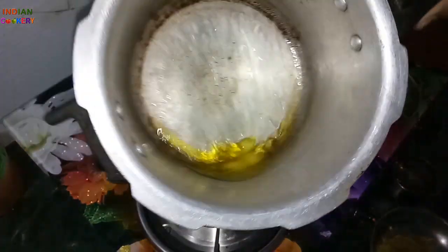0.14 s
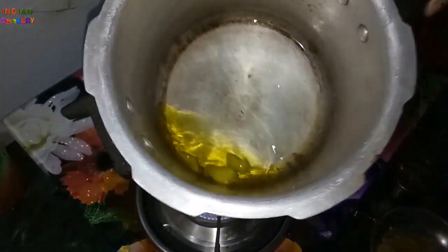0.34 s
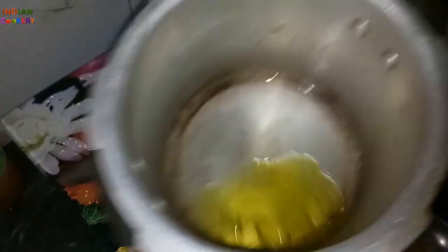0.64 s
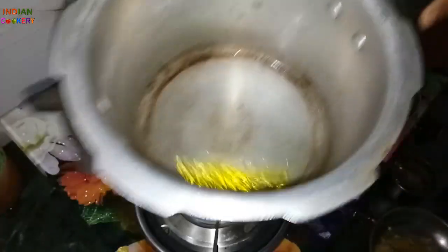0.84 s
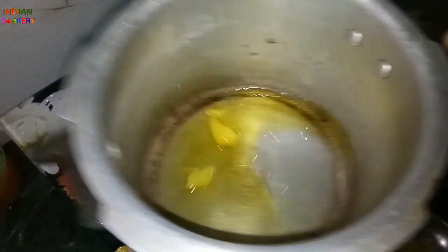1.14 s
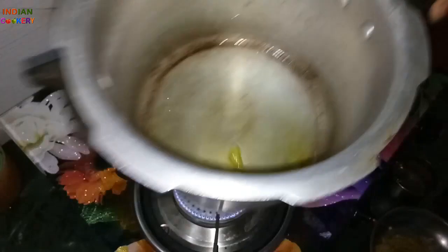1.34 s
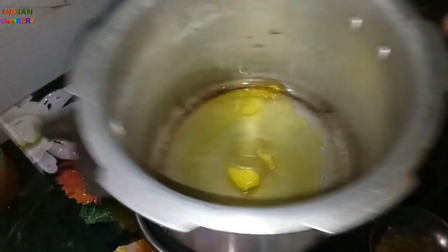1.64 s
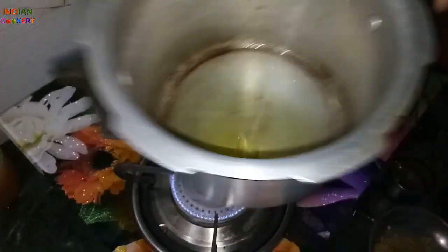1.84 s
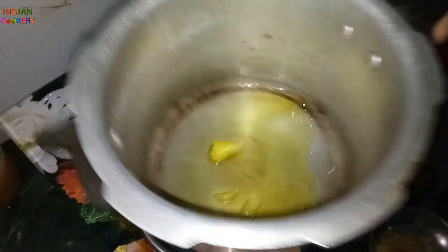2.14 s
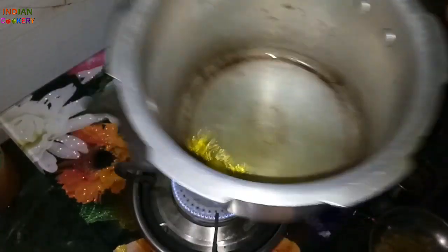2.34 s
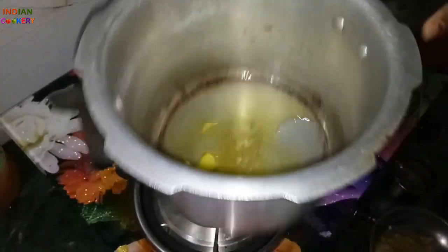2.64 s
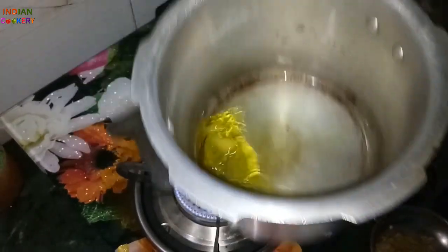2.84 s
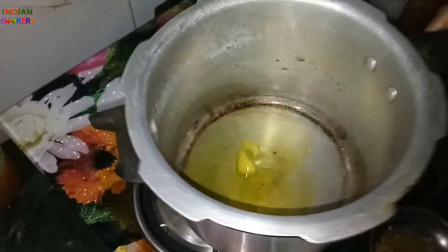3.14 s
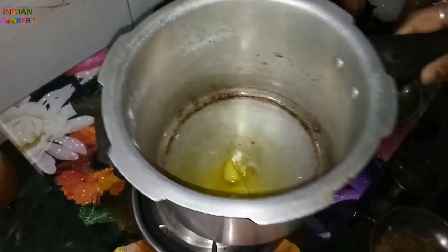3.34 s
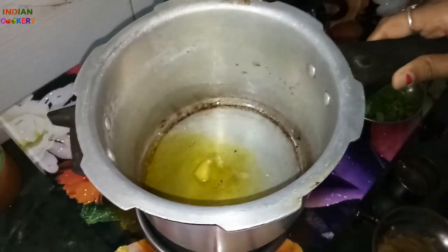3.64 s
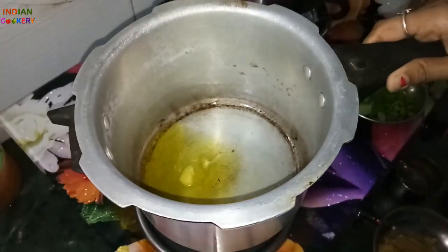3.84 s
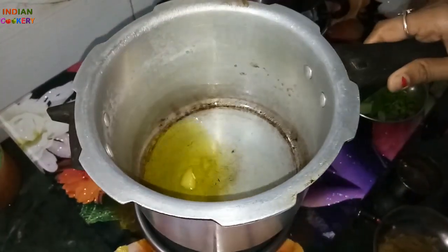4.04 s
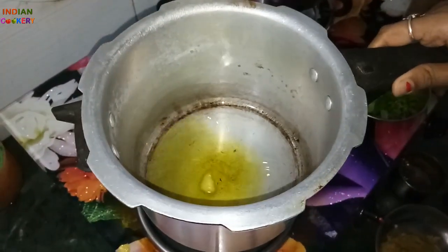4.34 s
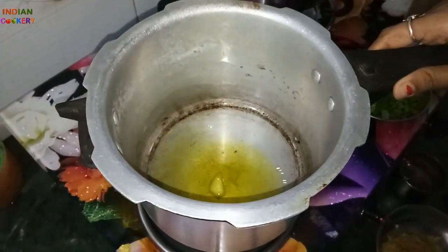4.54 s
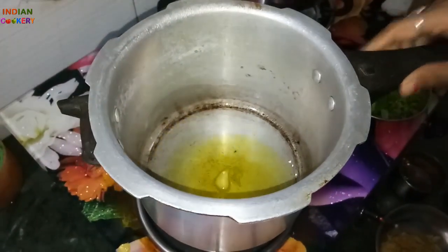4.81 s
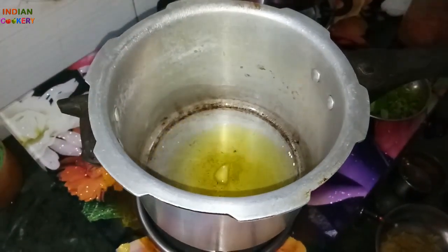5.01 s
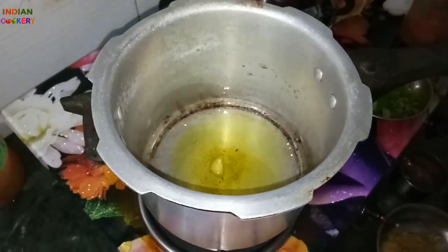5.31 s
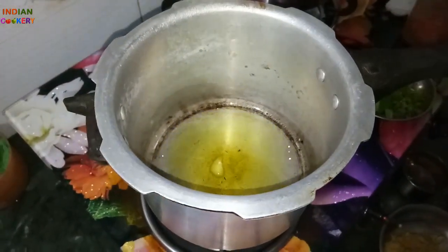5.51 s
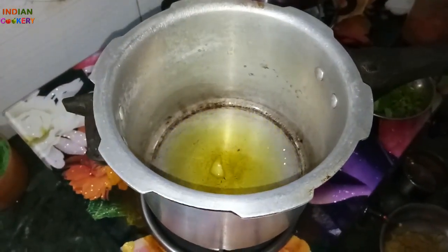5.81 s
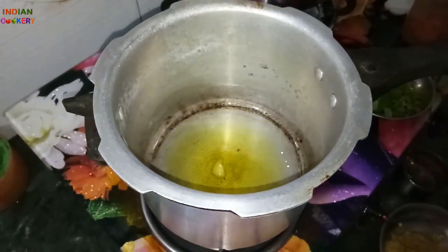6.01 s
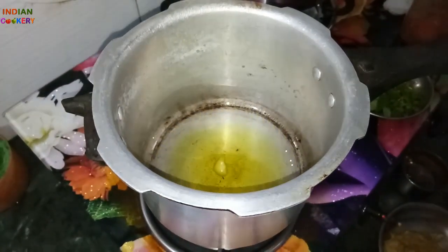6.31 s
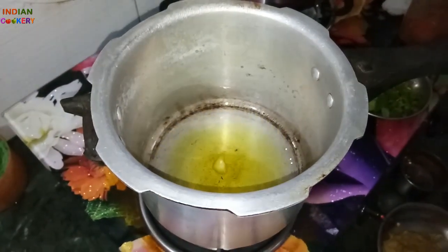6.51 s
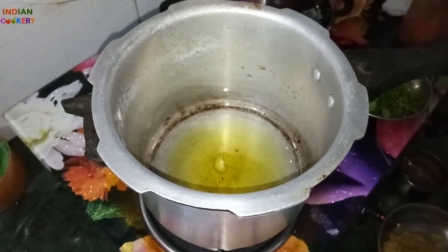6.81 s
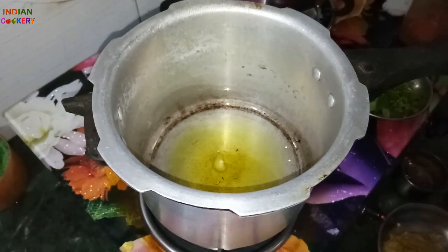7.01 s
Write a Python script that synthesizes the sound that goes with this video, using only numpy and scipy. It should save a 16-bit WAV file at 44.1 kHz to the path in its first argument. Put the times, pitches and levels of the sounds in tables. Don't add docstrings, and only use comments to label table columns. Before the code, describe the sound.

Hot fat spits and crackles sharply in a metal pot, bubbles ringing its thin base, with a few dull knocks on the counter.

```python
import sys
import numpy as np
from scipy import signal
from scipy.fft import rfft, irfft
from scipy.io import wavfile
from scipy.ndimage import uniform_filter1d

SR = 44100
rng = np.random.default_rng(int(sys.argv[2]) if len(sys.argv) > 2 else 0)


def natural_amplitude(level_db):
    exponent = np.asarray(level_db, float) / 20
    return 10 ** exponent


def store_wav(level_fs):
    pcm = np.round(np.clip(np.atleast_2d(level_fs), -1, 1) * 32767)
    wavfile.write(sys.argv[1], SR, pcm.T.astype(np.int16))


N = 315756
LENGTH = 16384
TIME, HZ = np.arange(LENGTH) / SR, np.fft.rfftfreq(LENGTH, 1 / SR)


def evened(x):
    return x / np.sqrt(np.mean(x ** 2) + 1e-20)


def read(points, hz):
    f, value = np.transpose(points)
    return np.interp(np.log(hz + 1), np.log(f + 1), value)


def over_time(points):
    return np.interp(np.arange(N) / SR, *np.transpose(points))


def add(mix, s, sound):
    part = mix[max(round(s * SR), 0):][:len(sound)]
    part += sound[:len(part)]


def coloured(x, gain):
    return irfft(rfft(x) * gain, len(x))


def peak(hz, sharp):
    return 1 / (1 + (sharp * (HZ / hz - hz / (HZ + 1))) ** 2)


def tilt(db):
    return natural_amplitude(db * np.log2((HZ + 1) / 2900))


def swell(rise):
    return 1 - np.exp(-TIME / rise)


def pops(table, source):
    out = np.zeros(N)
    for row, noise in zip(table, rng.standard_normal((len(table), LENGTH))):
        add(out, row[0], source(*row, noise))
    return out


# (frequency [Hz], level [dB])
MIC = [(500, -25), (2700, -12.5), (4100, 0), (7800, -1), (9000, 7), (10200, 7.5), (11500, 0), (13300, -7),
       (14100, -1), (14900, 6.5)]


def microphone(share=1):
    return natural_amplitude(share * read(MIC, HZ))


# (frequency [Hz], t60 [s])
CAVITY = [(1500, 0.046), (4000, 0.097), (8000, 0.062), (16000, 0.053)]


def echo(noise, gain, rise=0.00004):
    unevenness = evened(uniform_filter1d(noise[::-1], 70))
    ragged = natural_amplitude(4 * unevenness * swell(.006))
    hz, t, z = signal.stft(evened(coloured(noise, gain) * ragged), SR, nperseg=128)
    pot_fall = natural_amplitude(-60 * t / read(CAVITY, hz)[:, None])
    kitchen_fall = natural_amplitude(-21.0 - 60 * t / 0.46)
    return signal.istft(z * (pot_fall + kitchen_fall), SR, nperseg=128)[1][:LENGTH] * swell(rise)


# (frequency [Hz], level [dB], t60 [s], pull of the fat's load [exponent])
BASE = [(1584, -5, 0.18, 2), (2070, -7, 0.034, 2), (2385, 3.5, 0.14, 0.83), (2415, -7, 0.35, 0.8),
        (7290, -8, 0.088, -7.5), (3420, -7.5, 0.29, 0.43), (4035, -4, 0.092, 1.5), (5010, -3, 0.15, 1.1),
        (5514, -0.5, 0.062, 7), (6620, -1.5, 0.17, 0.3), (6900, 1, 0.036, 1), (8980, 4, 0.035, 1)]
LOAD_HZ = 2400
# (time [s], frequency [Hz])
LOAD = [
    (0, 2535),
    (.5, 2569),
    (1.25, 2545),
    (1.8, 2401),
    (2.55, 2518),
    (3.2, 2478),
    (4.3, 2485),
    (4.6, 2385),
    (5.2, 2424),
    (7.16, 2401),
]


def ring(s, gain, chance):
    hz, db, t60, give = np.transpose(BASE)[:, :, None]
    phase, uneven, detune, beat = chance[:4 * len(BASE)].reshape(4, -1, 1)
    load = np.interp(s, *np.transpose(LOAD)) / LOAD_HZ
    hz = hz * load ** give * (1 + 0.00603 * detune)
    wobble = 1 + .45 * np.sin(2 * np.pi * (25 * beat * TIME + detune))
    slosh = natural_amplitude(2.5 * evened(uniform_filter1d(chance, 250)))
    fall = natural_amplitude(db + 3.2 * uneven - 60 * TIME / t60)
    modes = fall * wobble * np.sin(2 * np.pi * (hz * TIME + phase))
    return np.interp(hz[:, 0], HZ, gain) @ modes * slosh * swell(0.0003)


def bubble(s, db, hz, ring_db, tilt_db, noise):
    gain = peak(hz, 8.1) + natural_amplitude(-22) * microphone(0.69)
    blip = np.sin(2 * np.pi * hz * TIME) * np.exp(-TIME * hz / 6.9) * swell(0.41 / hz)
    reach = (peak(hz, 1.63) + 0.13) * tilt(tilt_db)
    sound = 1.1 * blip + echo(noise, gain) + natural_amplitude(ring_db - 10.5) * ring(s, reach, noise)
    return natural_amplitude(db) * sound / abs(sound).max()


def sized(table, hz, spread):
    scatter = rng.standard_normal(len(table))
    return [(s, db, hz * (1 + spread * u), *rest) for (s, db, *rest), u in zip(table, scatter)]


# (time [s], peak level [dB], pitch [Hz], extra ring [dB], ring tilt [dB per octave])
LARGE = [(1.2346, -14, 3810, -3.5, -1.5), (1.263, -20, 2440, -17.5, -19), (1.8101, -19, 3810, -4, 1),
         (2.5745, -18.5, 3420, -7, 1), (3.0839, -14, 3570, -11, 5.5), (3.3871, -20, 3950, -18, 8),
         (3.8896, -15, 2390, -18, 6), (3.9044, -6.5, 2440, -7, -20), (4.0513, -9.5, 2230, -0.5, 6),
         (4.3207, -11.5, 2420, -1.5, -5), (4.588, -18.5, 3330, -3, -1.5), (4.6614, -21, 4200, -11, 7),
         (5.076, -17.5, 3420, -12.5, -4), (5.1305, -13, 3420, -3.5, 1), (5.1597, -16, 2380, -11, -3),
         (5.441, -17.5, 3420, -8.5, -6), (5.4594, -18, 3420, -6, -2), (5.979, -15, 3750, -10, -1.5),
         (6.3869, -15, 3890, -3.5, -4), (6.011, -20.5, 2390, -14, 0), (6.5185, -16, 3670, -10, -9),
         (6.556, -9.5, 2420, -0.5, 2), (6.7541, -17, 2800, 5, 0.5), (6.8224, -19.5, 3400, -9, 1),
         (6.919, -14, 2570, -3, -2.5), (7.0708, -14.5, 3400, 1, -3), (5.7544, -36, 2460, -6, 11),
         (.386, -19, 3670, -2, 12), (3.8897, -17.5, 1620, 3, -3), (4.0514, -20, 1740, 12, 3)]
MIDDLE = [(.0134, -18, 4430, -21, 3), (.6408, -12, 6250, -1.5, -1), (1.4835, -28, 4680, -4, -11),
          (1.7514, -23, 5010, -0.5, -4.5), (2.0687, -21, 6330, 1.5, -16), (2.4718, -21.5, 3620, -6, 4),
          (2.505, -18.5, 4800, -5.5, -1), (3.5438, -22, 5900, 3, -5), (3.8086, -18, 5430, -6.5, -10),
          (3.9644, -21.5, 4200, -8, 0), (4.1426, -18, 4600, -4.5, -18), (4.1996, -10, 4310, -12.5, -30),
          (4.5073, -18.5, 5570, -10, -1), (4.8912, -17.5, 4310, -10.5, -13),
          (5.2937, -18.5, 5300, 2.5, -5.5), (5.5742, -19.5, 5420, -3, 2), (5.6481, -17.5, 4670, -1, 0),
          (5.9165, -16, 4670, 4, -1), (5.9454, -21.5, 5370, -4, -10), (6.2771, -16, 5300, 3, 1.5),
          (6.4842, -25, 6500, 4, -2.5), (6.5909, -15, 6200, -1, -9), (6.6886, -22, 5060, -6.5, -4.5),
          (6.8294, -13.5, 5060, -1.5, -6.5), (6.8803, -20.5, 4000, -2, -9), (6.9721, -17.5, 5800, -1, -6),
          (7.0311, -17, 4350, -7, -9)]
# (time [s], peak level [dB])
SMALL = [(.0234, -11.5), (.0523, -19), (.0943, -36), (.3891, -15), (.4494, -22), (.7763, -22.5),
         (.8244, -17), (.878, -16.5), (1.05, -17), (1.1538, -22), (1.1794, -15.5), (2.3944, -33.5),
         (2.6135, -18.5), (2.8887, -15), (2.994, -16.5), (3.3173, -30.5), (3.4306, -19), (3.597, -20),
         (3.6704, -21.5), (3.8584, -21.5), (3.9394, -17.5), (4.0177, -14), (4.6408, -16), (5.007, -23),
         (5.4143, -16), (5.685, -18.5), (5.875, -22.5), (6.3674, -17.5), (6.7995, -17.5), (7.1514, -21)]


def bubbles():
    small = [(*row, 0, 0) for row in sized(SMALL, 6860, 0.0054)]
    rows = []
    for table, ring_db in ((LARGE, 13.5), (MIDDLE, 4), (small, -6)):
        for s, db, hz, more_db, tilt_db in table:
            rows.append((s, db, hz, ring_db + more_db - (db + 15.5), tilt_db))
    return pops(rows, bubble)


# (time [s], peak level [dB], pitch [Hz], ring [dB], ring tilt [dB per octave])
TRAILING = [
    (.896, -20, 4620, -6, 7),
    (5.441, -15.5, 5220, -8, 10),
    (5.527, -18, 6840, 1, -5),
    (5.6, -19, 4300, 2.5, -9.5),
    (5.62, -18, 6800, 3, -3),
    (6.13, -31, 6900, -8, 0),
]


def trailing_bubbles():
    return pops(TRAILING, bubble)


def spit(s, db, hz, echo_db, noise):
    colour = microphone()
    tick = np.roll(irfft(colour * (peak(hz, 5.2) + 0.31)), 26)
    tear = noise[-100:] * np.exp(-np.arange(100) / 22)
    snap = np.convolve(tick[:200], tear)
    answer = echo(noise, colour * (peak(hz, 6.3) + 0.24), rise=0.00043)
    answer = answer + 0.082 * ring(s, colour, noise)
    sound = natural_amplitude(echo_db - 11.5) * answer
    add(sound, 0, snap / abs(snap).max() * signal.windows.tukey(len(snap), .14))
    return natural_amplitude(db) * sound / abs(sound).max()


# (time [s], peak level [dB], echo in the pot [dB])
FAT = [(.0443, -10, 10), (.0872, -13, 3), (.4162, -18, -8), (.7765, -12, -8), (.8291, -14.5, 16),
       (.9548, -20, 13), (1.1763, -7.5, 2), (1.763, -10, 1), (2.0419, -4.5, -7.5), (2.0673, -13, -3),
       (2.2274, -7, -8), (2.4719, -10, -31), (2.5053, -18.5, -20), (2.5742, -22, 12), (2.6131, -16, -5),
       (2.7378, -7, -7.5), (2.9099, -14, 2), (3.083, -20, -17), (3.317, -18, 6), (3.546, -18, 20),
       (3.6667, -18, 16), (3.8513, -18, 3), (4.372, -2.5, -10), (4.5861, -12, -78), (5.525, -7, -4.5),
       (3.564, -13.5, -4.5), (5.6202, -6.5, -5), (6.1191, -23, 16), (6.7542, -16, -7), (7.1514, -22.5, 16)]
PLAIN = [(.0654, -8, -7), (.1984, -10.5, 1), (.2214, -23, -9), (.842, -13, 3), (.7348, -9.5, 1.5),
         (1.0516, -13, -11), (1.1444, -5, 1), (1.2482, -11.5, 1), (1.2906, -14.5, 1.5), (1.4402, -1, -12),
         (2.0768, -10, -9), (2.2015, -12, -9), (2.2464, -15.5, -7), (3.3875, -7.5, -11), (4.0663, -9, 2),
         (4.6085, -11, 2.5), (5.009, -8.5, -7), (5.4401, -15.5, 19), (5.4616, -16.5, 4), (5.6003, -9.5, -8),
         (5.8742, -17, -7), (5.9161, -16, 9), (5.9455, -14, -15), (5.9814, -12, -1), (6.3441, -18, 13),
         (.853, -14, -1), (6.5521, -14, -10), (6.8006, -21, 17), (7.0275, -25, 17), (7.0684, -17.5, 7)]
THIN = [(.0114, -5.5, -1), (.1048, -6.5, -1), (1.0995, -18, 15), (1.3978, -11, -50), (1.5814, -16, 20),
        (1.616, -13.5, 15), (1.8478, -16.5, -3), (2.098, -11.5, 24), (2.3766, -12, -5), (2.7004, -18, 14),
        (2.8101, -30.5, 4), (3.419, -17, -13), (2.9655, -7, 0), (3.038, -9, -6.5), (3.5128, -6, -25),
        (4.0039, -14, -5), (4.1236, -9.5, -11), (4.198, -13.5, -17), (4.2688, -19, -4),
        (4.4434, -10.5, -10.5), (4.8789, -18, -4), (5.077, -21.5, 16), (5.4132, -22, -3),
        (6.2174, -14.5, -5.5), (6.2762, -8, -11), (6.4389, -15, 0), (6.5985, -8.5, -25), (3.4545, -23, -19),
        (6.8963, -10, 0), (6.9727, -16, -9)]
FINE = [(.164, -8, -0.5), (.2354, -7, -4), (.2633, -9, -4), (.311, -14, 3), (1.025, -8.5, -11),
        (1.362, -7, -22), (1.4866, 0.5, -10), (1.54, -6.5, -23), (1.7035, -9.5, -8), (1.9137, -7, -6),
        (1.9391, -9.5, -1.5), (2.011, -9.5, -14), (2.0887, -3.5, -7), (2.236, -23, -16), (2.3083, -15, -7),
        (3.629, -11, -9), (4.1431, -12, 10), (4.2913, -10.5, -3), (5.182, -13, 10), (5.285, -10.5, 5)]
# (time [s], peak level [dB])
TICKS = [(0.3300, -11), (0.4633, -21), (0.518, -28), (0.539, -16), (0.8382, -19), (0.8787, -31),
         (1.112, -10), (1.429, -35), (1.4706, -17), (1.8856, -44), (2.178, -27), (2.349, -30), (2.544, -42),
         (2.6176, -13), (2.682, -24), (2.9304, -34), (2.972, -21), (3.017, -40), (3.0941, -25),
         (3.114, -23), (3.1317, -11.5), (3.1543, -16.5), (3.43, -13), (3.4393, -14), (3.449, -33),
         (3.698, -20.5), (3.9538, -11), (4.88, -31), (5.15, -21), (6.7043, -13.5)]


def spits():
    ticks = [(s, db, -7) for s, db in TICKS]
    sizes = ((FAT, 9010), (PLAIN, 9810), (THIN, 10470), (FINE, 14500), (ticks, 10900))
    return sum(pops(sized(table, hz, 0.0069), spit) for table, hz in sizes)


# (time [s], peak
# level [dB], pitch [Hz], echo in the pot [dB])
STRAY = [(0.08, -9, 9000, -3), (0.1058, -19, 10400, -7), (0.1274, -14.5, 8700, 9), (0.1469, -12, 9400, -1),
         (0.1717, -20, 9500, -5), (0.179, -7, 9200, -14), (0.2083, -7.5, 9600, -3.5),
         (0.245, -15.5, 9600, -3), (0.2797, -16.5, 10700, -9), (0.352, -12.5, 10700, -2),
         (0.3815, -17, 6950, -9), (0.4277, -12, 7000, -3), (0.7128, -17.5, 10000, -11),
         (1.2076, -13, 6900, -5), (1.421, -24, 9800, 2), (1.4507, -24, 9660, 6), (1.567, -21, 10200, -3),
         (1.793, -18, 14800, 8), (1.959, -16, 11200, 0), (2.152, -14.5, 10200, -12), (6.131, -17, 9010, -2),
         (6.1829, -27, 6900, 0), (6.5072, -19.5, 3700, 8)]


def stray_spits():
    return pops(STRAY, spit)


def crack(s, db, noise):
    gain = microphone(0.12) * HZ / (HZ + 900)
    step = np.roll(irfft(gain), 26) * signal.windows.tukey(LENGTH, .002)
    sound = step / abs(step).max() + natural_amplitude(-26.5) * echo(noise, gain * microphone(0.32))
    return natural_amplitude(db) * sound / abs(sound).max()


# (time [s], peak level [dB])
CRACKS = [(1.326, -7), (1.374, -8), (1.6442, -4), (2.112, 3), (2.377, -10.5), (3.387, 0.5), (3.3995, -1),
          (3.4103, -19), (3.518, -16), (3.541, 2), (3.886, -11), (4.319, -12), (5.009, -3), (6.552, -25)]
# (time [s], peak level [dB])
SPARKS = [
    (.99, -24),
    (1.226, -18),
    (2.255, -53),
    (3.582, -8.5),
    (3.646, -31),
]


def cracks():
    return pops(CRACKS, crack) + pops(SPARKS, crack)


# (time [s], level [dB])
FIZZ = [(0, -29.5), (.148, -49.5), (.372, -43), (.385, -28.5), (.55, -32.5), (.8, -49.5), (.88, -24.5),
        (1.0, -74), (1.45, -41), (1.75, -61), (2.101, -53), (2.3, -76), (2.62, -48), (2.85, -76),
        (3.051, -52), (3.27, -82), (3.95, -49.5), (4.75, -73)]
# (time [s], extra fine spit [dB])
SWIRL = [
    (0, 19),
    (.6, -4.5),
    (1.3, 16),
    (2.3, 16),
    (2.7, 15),
]


def fizz():
    db, fine_db = over_time(FIZZ), over_time(SWIRL)
    struck = rng.random(N) < 1100 / SR
    size = natural_amplitude(3.2 * np.minimum(rng.exponential(1, N), 3)) * struck
    kind, noise = rng.integers(0, 12, N), rng.standard_normal((12, LENGTH))
    plain_hz, fine_hz = (8900, 9600, 10200, 11900), (15000, 15400, 14200, 15300)
    bubble_hz = (3580, 4200, 4940, 6950)
    grains = [spit(0.34, 0, hz, -14.0, n) for hz, n in zip(plain_hz, noise)]
    grains += [spit(0.34, 0, hz, -6.0, n) for hz, n in zip(fine_hz, noise[4:])]
    grains += [bubble(1.0, 0, hz, -8.5, 0, n) for hz, n in zip(bubble_hz, noise[8:])]
    levels = natural_amplitude([db, db + fine_db, db - 9.5])
    out = np.zeros(N)
    for k, grain in enumerate(grains):
        out += signal.oaconvolve(size * levels[k // 4] * (kind == k), grain)[:N]
    return out


def swarm(s, db, t60, tilt_db, noise):
    patter = noise ** 3 * natural_amplitude(-60 * TIME / t60)
    song = signal.fftconvolve(patter, ring(s, tilt(tilt_db), 0.75 * noise))[:LENGTH]
    return natural_amplitude(db) * song / song[:4000].std() * signal.windows.tukey(LENGTH, .1)


# (time [s], level [dB], t60 of the swarm [s], tilt [dB per octave])
SWARMS = [
    (0, -54, 0.34, 18),
    (.385, -42, 0.23, 8),
    (.45, -36, 0.34, 8.5),
    (1.15, -46, 0.62, 7),
    (6.1, -60, 0.99, -8),
]


def swarms():
    return pops(SWARMS, swarm)


def ping(s, db, hz, t60, rise, noise):
    slosh_db = 2.2 * evened(uniform_filter1d(noise, 500))
    return natural_amplitude(db + slosh_db - 60 * TIME / t60) * np.sin(2 * np.pi * hz * TIME) * swell(rise)


# (time [s], peak level [dB], frequency [Hz], t60 [s], rise [s])
PINGS = [(.023, -23, 6800, 0.22, .004), (.053, -17, 6800, 0.039, 0.0015), (.093, -25, 6720, 0.11, 0.0015),
         (1.262, -15.5, 2567, 0.12, 0.008), (1.811, -21.5, 3476, 0.11, 0.0014),
         (1.812, -29, 5010, 0.12, 0.0018), (2.473, -32, 2560, 0.11, 0.0021),
         (2.576, -28.5, 2490, 0.075, 0.0011), (2.59, -26, 3500, 0.12, .003),
         (3.085, -20.5, 3540, 0.2, 0.0029), (3.155, -32.5, 2510, 0.077, 0.0023),
         (3.892, -8, 2518, 0.093, 0.0034), (4.053, -24, 2200, 0.11, 0.0027), (4.06, -23, 2362, 0.2, 0.0033),
         (4.588, -17, 3430, 0.2, 0.00039), (4.893, -28, 2446, 0.054, 0.0007),
         (5.078, -26, 3510, 0.22, 0.0018), (5.161, -30, 2410, 0.23, 0.0018),
         (5.442, -27, 2395, 0.11, 0.0015), (6.279, -33, 2444, 0.15, 0.0028),
         (6.556, -21.5, 3383, 0.14, 0.0016), (6.822, -31.5, 3416, 0.39, 0.0022),
         (5.443, -18.5, 3420, 0.22, 0.0029), (5.446, -38, 5080, 0.63, .004), (5.515, -28, 2440, 0.14, .004),
         (5.757, -38, 2430, 0.1, .003), (5.985, -22.5, 3410, 0.2, 0.0075), (7.071, -21, 3400, 0.19, 0.0014),
         (.45, -37.5, 3520, 0.4, 0.0077), (.455, -37, 4440, 0.27, .01), (3.086, -25, 2530, 0.15, 0.0033),
         (6.756, -34, 3250, 0.16, 0.0027), (3.672, -44, 3460, 0.18, 0.011)]


def pings():
    return pops(PINGS, ping)


# (frequency [Hz], level [dB], t60 [s])
COUNTER = [(246.8, -20, 0.62), (347.4, 0.5, 0.16), (444, -19, 0.25), (670, -20, 0.11), (964, -9, 0.25),
           (1317, -12, 0.27)]
# (frequency [Hz], density [dB per Hz])
THUD = [(53, -52), (100, -11), (190, -9), (244, 4), (288, -1.5), (2420, -29.5), (3500, -48), (4550, -44),
        (7700, -120)]


def knock(s, db, rise, t60, bright_db, noise):
    gain = natural_amplitude(read(THUD, HZ) + bright_db * np.log2((HZ + 1) / 300))
    rattle = natural_amplitude(1.04 * evened(uniform_filter1d(noise[::-1], 400)))
    hz, t, z = signal.stft(evened(coloured(noise * rattle, gain)), SR, nperseg=256)
    quick = (1 + hz[:, None] / 900) / 1.53
    thud = signal.istft(z * natural_amplitude(-60 * t * quick / t60), SR, nperseg=256)[1][:LENGTH]
    modes = np.zeros(LENGTH)
    for (mode_hz, mode_db, mode_t60), phase in zip(COUNTER, noise):
        modes += natural_amplitude(mode_db - 60 * TIME / mode_t60) * np.sin(2 * np.pi * (mode_hz * TIME + phase))
    sound = thud + 1.06 * modes * (1 - np.exp(-(TIME / 0.023) ** 2))
    sound = sound * (1 - np.exp(-(TIME / max(rise, .001)) ** 2))
    return natural_amplitude(db) * sound / abs(sound).max()


# (time [s], peak level [dB], rise [s], t60 [s], brightness [dB per octave])
KNOCKS = [
    (3.665, -46.5, 0.0021, 0.99, 7),
    (3.75, -47, 0.0032, 1, 6),
    (3.968, -25, 0.015, 0.43, 6.5),
    (4.39, -20.5, 0.0074, 0.37, 4.5),
    (4.68, -52, 0.0065, 0.29, -1),
    (4.784, -27, 0.001, 0.65, 7),
    (5.002, -30.5, 0.0075, 0.45, 3.5),
    (5.06, -36.5, 0.0071, 0.48, 3),
    (5.19, -46.5, 0.0073, 0.42, 4.5),
]


def knocks():
    return pops(KNOCKS, knock)


def boom(s, db, hz, t60, rise, noise):
    twin = ping(s, db, hz * 1.03, t60, rise, noise[::-1])
    return ping(s, db, hz, t60, rise, noise) + natural_amplitude(-1.5) * twin


# (time [s], peak level [dB], frequency [Hz], t60 [s], rise [s])
BOOMS = [
    (3.99, -32.5, 257, 0.2, 0.015),
    (4.395, -27.5, 243.5, 0.41, 0.012),
    (4.795, -36.5, 246.4, 0.51, 0.016),
    (5.01, -41, 248.8, 0.61, 0.0087),
    (5.08, -36.5, 657, 0.09, .008),
]


def booms():
    return pops(BOOMS, boom)


# (frequency [Hz], density [dB per Hz])
FLAME = [(12, 3), (20, -23.5), (542, -0.5), (923, -15.5), (2390, 0), (2910, -15), (6720, -2), (7950, -35),
         (9950, -17), (14700, -17), (16000, 8)]
# (time [s],
# extra level # [dB])
LIFTED = [
    (.5, 3.5),
    (.68, 5.5),
    (.85, 0.5),
    (2.3, 3.5),
    (3.05, -1.5),
    (3.2, 8.5),
    (3.301, 1),
    (3.549, 4.5),
    (3.8, -1.5),
]


def flame():
    frames, hz = N // 256 + 5, np.fft.rfftfreq(1024, 1 / SR)
    a, b, patches = rng.standard_normal((frames, 513, 3)).T
    patches = evened(uniform_filter1d(uniform_filter1d(patches, 8, 0), 16, 1))
    z = (a + 1j * b) * natural_amplitude(read(FLAME, hz)[:, None] + 2.5 * patches)
    hiss = evened(signal.istft(z, nperseg=1024, noverlap=768)[1][:N])
    return natural_amplitude(-46 + over_time(LIFTED)) * hiss


# (frequency [Hz], rms level [dB])
HUM = [(50, -71), (100, -72)]
# (time [s], level [dB], frequency [Hz], t60 [s])
CLINK = (1.28, -58, 895, 1.6)


def kitchen():
    waver = evened(uniform_filter1d(rng.standard_normal((len(HUM), N)), 3000))
    out = np.zeros(N)
    for (hz, db), w in zip(HUM, waver):
        out += natural_amplitude(db) * (w + 0.42) * np.sin(2 * np.pi * hz * np.arange(N) / SR)
    s, db, hz, t60 = CLINK
    clink = natural_amplitude(db - 60 * TIME / t60) * np.sin(2 * np.pi * hz * TIME)
    add(out, s, clink * signal.windows.tukey(LENGTH, .3))
    return out


def scene():
    pot = fizz() + bubbles() + spits()
    pot = signal.sosfilt(signal.butter(4, 450, "high", fs=SR, output="sos"), pot)
    pot = pot + trailing_bubbles() + stray_spits() + cracks() + swarms() + pings()
    return (pot + knocks() + booms() + flame() + kitchen())[None]


def roll_off(x):
    return signal.sosfilt(signal.butter(12, 16830, fs=SR, output="sos"), x)


# (frequency [Hz], level [dB])
EDGE = [(14000, 0), (15650, -3), (15900, -42), (16800, -42), (17000, -80)]


def record(dry):
    soft = .9 * np.tanh(dry[0] / .9)
    edged = coloured(soft, natural_amplitude(read(EDGE, np.fft.rfftfreq(N, 1 / SR))))[None]
    return roll_off(edged)


dry = scene()
out = record(dry)
store_wav(out)
```